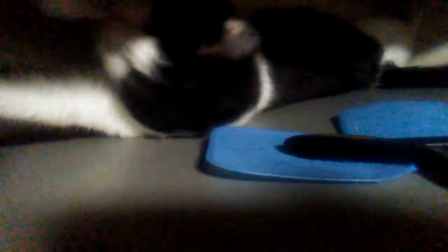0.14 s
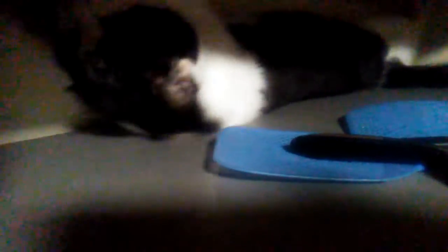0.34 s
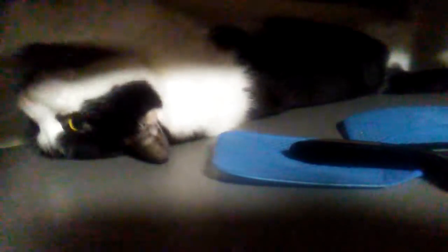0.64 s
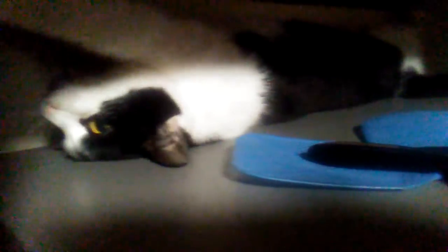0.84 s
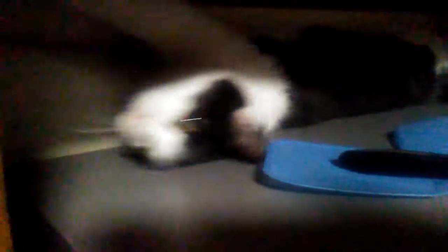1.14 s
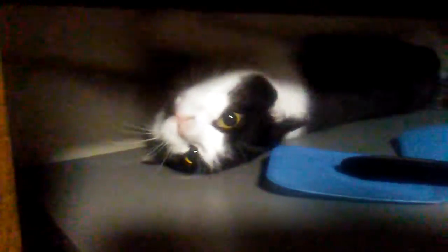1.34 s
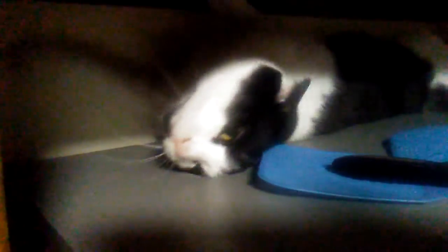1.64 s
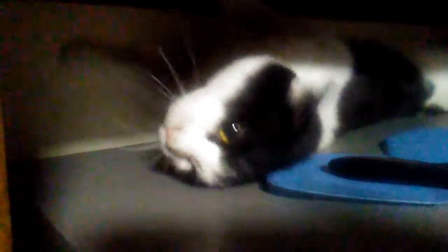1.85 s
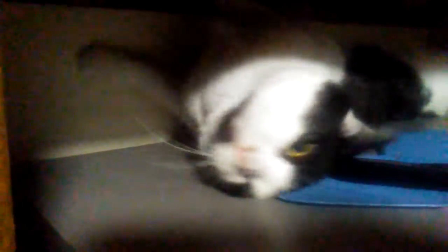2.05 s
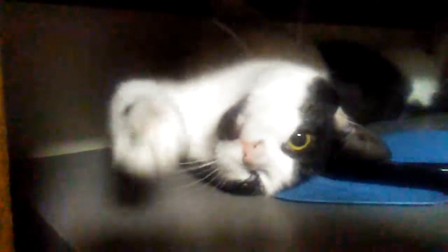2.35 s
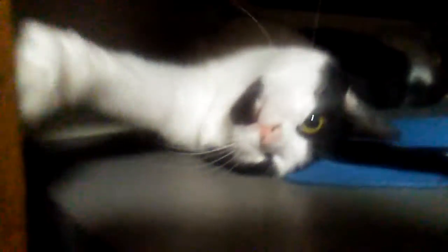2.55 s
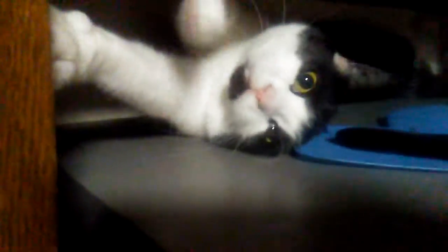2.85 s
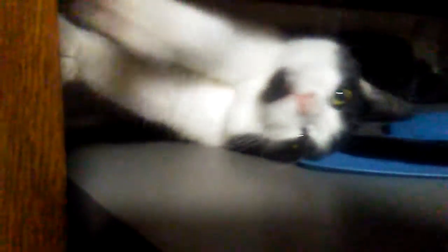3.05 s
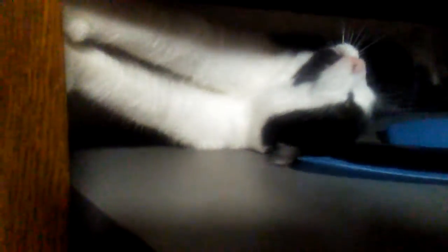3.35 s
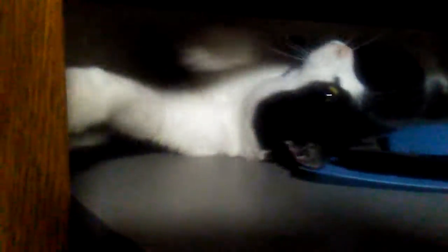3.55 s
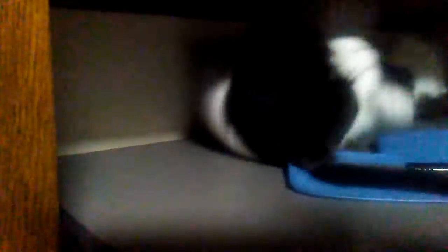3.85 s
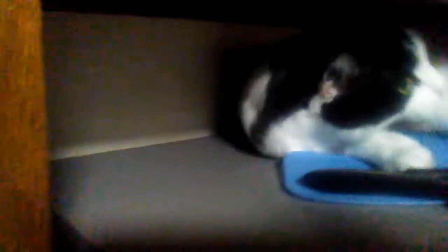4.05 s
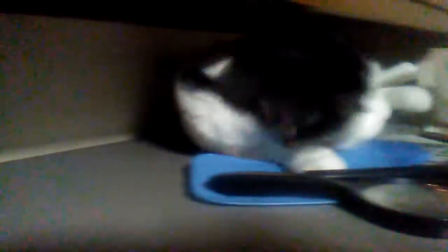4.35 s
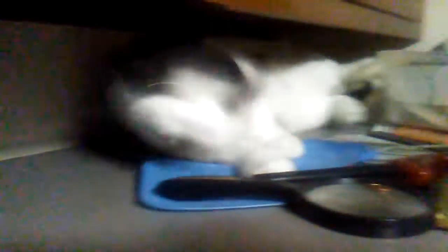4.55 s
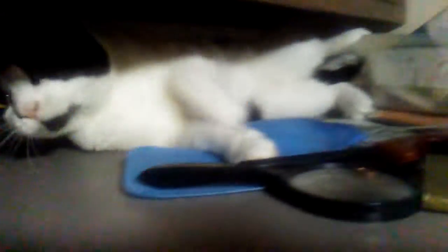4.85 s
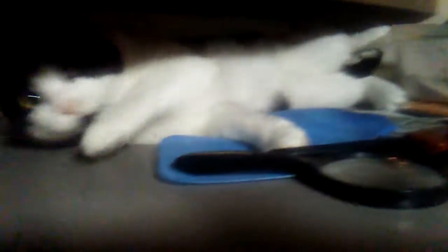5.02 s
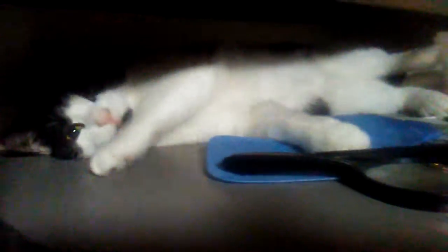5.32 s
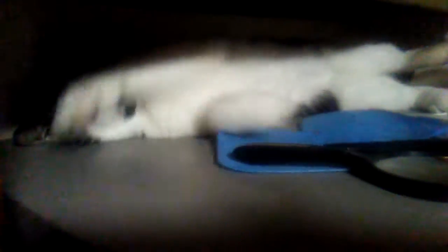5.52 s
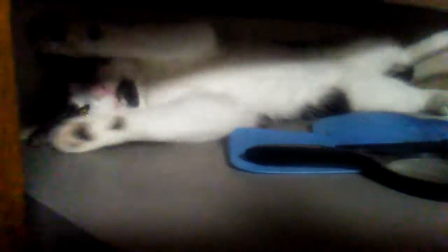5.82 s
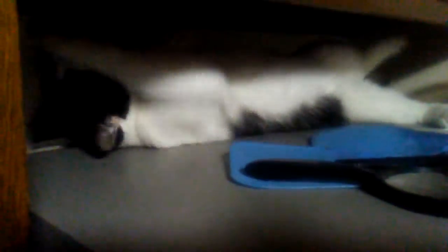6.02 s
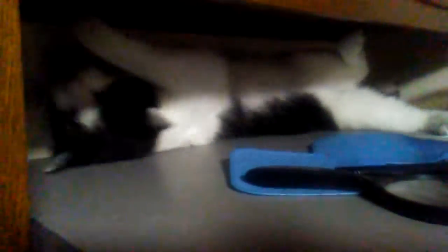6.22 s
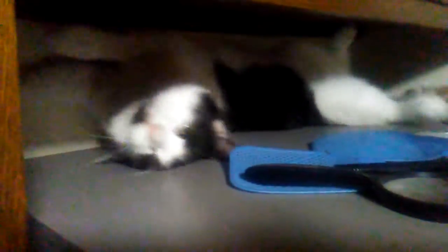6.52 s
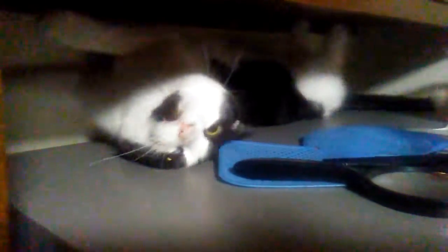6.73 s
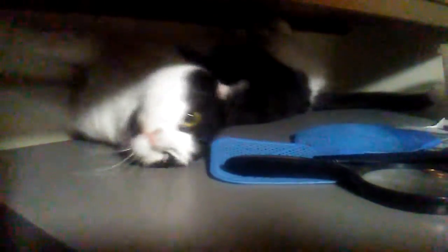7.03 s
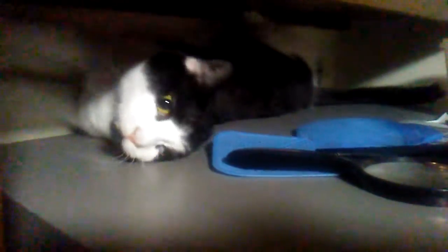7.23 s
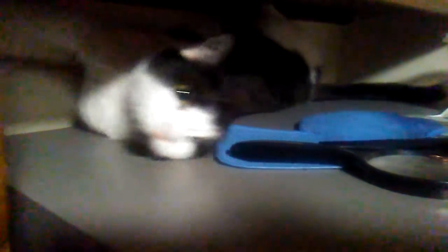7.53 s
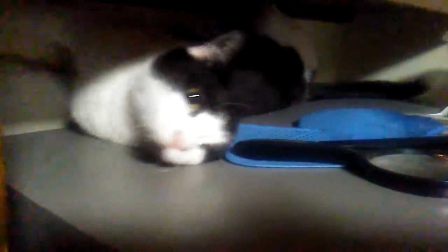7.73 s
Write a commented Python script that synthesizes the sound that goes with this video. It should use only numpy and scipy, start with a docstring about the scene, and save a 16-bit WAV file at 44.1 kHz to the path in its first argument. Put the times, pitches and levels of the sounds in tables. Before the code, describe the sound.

Close, dry indoor sound of a cat squirming on a hard surface under furniture. Fur brushes in short swells, paws slide with bright hisses, claws rasp briefly on a hard edge, and soft paws bump wood. The busiest part is the middle, from about four to six and a half seconds; afterwards only light rustling remains. Behind it all, a refrigerator hums steadily on one note with a muffled airflow.

```python
"""Refrigerator hum and a rolling cat

A refrigerator fan hums as a nearly pure sine, with a soft rush of air as noise shaped by resonances.
Close to the microphone a cat rolls about in a low furniture nook: fur and paws rub as shaped friction
noise, claws ring a hard edge by stick-slip, and paws knock lightly on wood as decaying modes."""
import sys
import numpy as np
from scipy import signal
from scipy.fft import rfft, irfft, next_fast_len
from scipy.io import wavfile
from scipy.ndimage import uniform_filter1d, map_coordinates

SR = 44100
rng = np.random.default_rng(int(sys.argv[2]) if len(sys.argv) > 2 else 0)


def generate_wav(signal):
    """Clip the signal to [-1, 1] and save it as 16-bit WAV at the path in sys.argv[1]."""
    frames = np.transpose(np.atleast_2d(signal))
    scaled = np.clip(frames, -1, 1) * 32767
    pcm = np.round(scaled).astype(np.int16)
    wavfile.write(sys.argv[1], SR, pcm)


N = 347508


def amp(db):
    """Logarithmic level: decibels to amplitude gain."""
    return 10 ** (np.asarray(db) / 20)


def unit(x):
    """Power normalisation: scale a signal to rms 1."""
    return x / np.sqrt(np.mean(x ** 2) + 1e-20)


def colour(points, hz):
    """Spectral envelope: gain through points of frequency_hz, gain_db, joined on a log frequency axis."""
    point_hz, gain_db = np.transpose(points)
    return amp(np.interp(np.log(hz + 1), np.log(point_hz), gain_db))


def resonances(modes, hz):
    """Modal response: gain of centre_hz, width_hz, gain_db modes with steep skirts, added in power."""
    power = 0
    for centre, width, gain_db in modes:
        gain = amp(gain_db) / (1 + ((hz - centre) / width) ** 2)
        power = power + gain ** 2
    return np.sqrt(power)


def brighter(hz, tilt, above_hz=5000):
    """Spectral tilt: treble gain that changes by tilt dB per octave."""
    octaves = np.log2(np.maximum(hz / above_hz, 1))
    return amp(tilt * octaves)


def filtered(x, response):
    """Linear filtering: multiply the spectrum of x by a response of frequency."""
    size = next_fast_len(len(x) + SR // 4)
    spectrum = rfft(x, size) * response(np.fft.rfftfreq(size, 1 / SR))
    return irfft(spectrum, size)[:len(x)]


def wobble(rate):
    """Slow random modulation: a smooth curve through rate random knots a second."""
    knots = rng.standard_normal(int(N * rate / SR) + 4)
    return map_coordinates(knots, [np.arange(N) * rate / SR])


def friction(count, slips_per_s, grain):
    """Stick-slip friction: smooth hiss mixed with tiny separate slips."""
    hiss, sizes = rng.standard_normal((2, count))
    slips = sizes * (rng.random(count) < slips_per_s / SR)
    return unit(hiss + grain * unit(slips))


def patchy(x, depth_db):
    """Varying contact: the colour of a rubbing sound shifts from moment to moment as the contact moves."""
    z = signal.stft(x, nperseg=512)[2]
    field = rng.standard_normal(z.shape)
    field = uniform_filter1d(field, size=3, axis=0)  # across frequency
    field = uniform_filter1d(field, size=10, axis=1)  # across time
    return signal.istft(z * amp(depth_db * unit(field)), nperseg=512)[1][:len(x)]


def from_peak(t, length, rise_share):
    """Stroke envelope shape: distance from the peak, 0 at t = 0 and 1 at the start and end."""
    return np.maximum(-t / rise_share, t / (1 - rise_share)) / length


def add(track, s, sound):
    """Superposition: mix a sound into the track at time s."""
    start = round(s * SR)
    sound = sound[max(-start, 0):]
    part = track[max(start, 0):][:len(sound)]
    part += sound[:len(part)]


def hum(flutter_db=0.23, drift_hz=0.13, octave_db=-35):
    """Periodic fan tone: a sine with a faint octave creeps up in pitch as the fan reaches full speed."""
    start_hz, creep_hz_per_s, full_hz = 348.7, 0.66, 352.0
    full_speed_db, db_per_hz = -24.65, 0.15  # a slower fan is slightly softer
    pitch = np.minimum(start_hz + creep_hz_per_s * np.arange(N) / SR, full_hz)
    phase = 2 * np.pi * np.cumsum(pitch + drift_hz * wobble(8)) / SR
    level_db = full_speed_db + db_per_hz * (pitch - full_hz) + flutter_db * wobble(12)
    tone = np.sin(phase) + amp(octave_db) * np.sin(2 * phase)
    return np.sqrt(2) * amp(level_db) * tone


def air(rush_db=-14, cabinet_db=-14, place_db=-14, sway_db=0.9, move_s=3.82, move_length_s=0.26):
    """Broadband excitation of resonances: fan air fills modes that change as the microphone moves."""
    # spectrum of the open rush: frequency_hz, gain_db
    rush_colour = [(25, -68), (42, -52), (60, -27), (120, -36), (150, -45), (185, -9), (250, -14),
                   (430, -15.5), (1000, -18), (2200, -22), (2800, -25.5), (4050, -28), (4600, -50.5),
                   (16000, -58)]
    # cabinet and kitchen modes that the air excites: centre_hz, width_hz, gain_db
    cabinet_modes = [(138, 3.9, -27), (187.2, 11.3, -4.5), (203.5, 10, -10.5), (224, 4.7, -8.5),
                     (271.8, 5.4, 3), (283.2, 10.2, 3), (301, 8, 1.5), (337.5, 12, 2.5), (362, 20.7, 1.5),
                     (393.8, 7.7, -2), (510, 22.7, -7), (694, 25, -13.5)]
    # modes heard from the first microphone position: centre_hz, width_hz, gain_db
    first_modes = [(708, 12, -13), (1068, 26, -13.5), (1215, 50, -13), (1720, 96, -20), (2253, 110, -18.5),
                   (3130, 76, -21.5), (3560, 290, -23)]
    # modes heard from the second microphone position: centre_hz, width_hz, gain_db
    second_modes = [(632, 29, -15), (681.5, 25, -10), (786, 16, -14.5), (853, 48, -15.5), (999, 30, -9.5),
                    (1061, 35, -12), (1244, 71, -16.5), (1676, 100, -18.5), (1967, 99, -20),
                    (2170, 90, -25.5)]
    broad, boxed, before, after = rng.standard_normal((4, N))
    rush = amp(rush_db + sway_db * wobble(2.4)) * filtered(broad, lambda hz: colour(rush_colour, hz))
    cabinet = amp(cabinet_db) * filtered(boxed, lambda hz: resonances(cabinet_modes, hz))
    # equal-power crossfade between the positions
    moved = (1 + np.tanh((np.arange(N) / SR - move_s) / move_length_s)) / 2
    first = np.sqrt(1 - moved) * filtered(before, lambda hz: resonances(first_modes, hz))
    second = np.sqrt(moved) * filtered(after, lambda hz: resonances(second_modes, hz))
    return rush + cabinet + amp(place_db) * (first + second)


def fur(flicker_db=0.9, patchy_db=1.0, rest_db=-62):
    """Incoherent summation: countless hairs slip over the surface; each turn of the cat is one swell."""
    # turns of the cat: peak_s, level_db, length_s
    turns = [(0.018, -37.5, 0.51), (0.425, -38.5, 0.34), (0.884, -43, 0.91), (1.317, -39, 0.24),
             (1.647, -49, .32), (1.848, -46, .13), (2.066, -47.5, .3), (2.565, -46, .22),
             (2.725, -51.5, 0.071), (2.9, -38, 0.18), (3.286, -51, .33), (3.684, -50.5, 0.29),
             (3.967, -48.5, 0.48), (4.443, -47.5, 1), (5.08, -51, .2), (5.503, -51, 0.32),
             (5.847, -50, .25), (6.26, -48, 0.23), (6.671, -44, 0.18), (7.01, -41, 0.17),
             (7.178, -51, 0.27), (7.4, -50.5, .3), (7.694, -50, 0.76)]
    # spectrum of fur on the surface: frequency_hz, gain_db
    hair_colour = [(400, -22), (1200, -8), (2300, 6.5), (2900, 1), (3950, 4.5), (4600, -18.5),
                   (5500, -17.5), (7000, -2.5), (8400, 0.5), (10000, -6.5), (13000, -11), (16000, -14)]
    rise_share, edge_drop_db, roundness = 0.44, 11, 1.22  # every turn swells and fades alike
    t = np.arange(N) / SR
    power = amp(rest_db) ** 2  # faint brushing between turns
    for s, level_db, length in turns:
        drop_db = edge_drop_db * from_peak(t - s, length, rise_share) ** roundness
        power = power + amp(level_db - drop_db) ** 2
    hairs = patchy(friction(N, slips_per_s=810, grain=0.45), patchy_db)
    brushing = unit(filtered(hairs, lambda hz: colour(hair_colour, hz)))
    return np.sqrt(power) * amp(flicker_db * wobble(35)) * brushing


def swipes(patchy_db=3.5, grain=0.44, judder_db=1.3, rise_share=0.47):
    """Sliding friction: a paw's slips hiss and excite the surface while the stroke swells and fades."""
    # broad strokes of a paw: peak_s, length_s, hiss_db, body_db, pitch_factor
    strokes = [(0.055, 0.12, -40.5, -33, 1.04), (0.333, 0.49, -41.5, -42, 1.1), (0.95, .42, -52, -41, 1.03),
               (1.282, 0.24, -55.5, -36, 1), (4.711, 1, -46.5, -39, 0.984), (4.804, .7, -38, -35, 0.94),
               (4.912, .28, -37.5, -29, .99), (4.968, 0.58, -28.5, -29.5, .96),
               (5.012, 0.41, -33, -26, 1.033), (5.447, .31, -24.5, -31.5, 1.4),
               (5.866, 0.32, -39, -36.5, 1), (6.205, .36, -43.5, -47, 0.87), (6.62, .4, -58, -47, 1.1),
               (6.963, .5, -53.5, -42, 1.03), (7.575, .16, -54, -45, 1.15)]
    # modes of the surface under the paw: centre_hz, width_hz, gain_db
    surface_modes = [(1350, 130, -5.5), (1995, 94, 0.5), (2280, 130, -1.5), (2880, 270, -9),
                     (3460, 140, -8), (3926, 87, -3.5)]
    # spectrum of the hiss: frequency_hz, gain_db
    hiss_colour = [(300, -68), (2000, -29.5), (3000, -17.5), (4200, -9.5), (6000, -7.5), (7200, 0),
                   (9200, -3), (10500, -9.5), (13000, -13), (16000, -19)]
    base_tilt_db, quick_tilt_db = 1.5, 6  # per octave; a quicker, higher swipe is brighter
    track, t = np.zeros(N), np.arange(SR // 2) / SR
    t -= t.mean()  # the peak lies mid-window
    for s, length, hiss_db, body_db, pitch in strokes:
        fall_db = -60 * from_peak(t, length, rise_share)
        stroke = amp(fall_db + judder_db * wobble(70)[:len(t)])
        tilt = base_tilt_db + quick_tilt_db * (pitch - 1)
        slips = patchy(friction(len(t), slips_per_s=730, grain=grain), patchy_db)
        hiss = filtered(slips, lambda hz: colour(hiss_colour, hz) * brighter(hz, tilt))
        body = filtered(slips, lambda hz: resonances(surface_modes, hz / pitch))
        add(track, s + t[0], stroke * (amp(hiss_db) * unit(hiss) + amp(body_db) * unit(body)))
    return track


def knocks(ring_db=-13, crack_db=-7.0, crack_t60=0.073, thud_below_hz=950):
    """Impact excitation of modes: soft paws strike the wood with a dull crack and a short ring."""
    # light knocks: start_s, level_db, thud_db, tilt_db (treble gain at 3 kHz and above)
    blows = [(1.165, -32.5, -3, -12), (1.853, -31, 1, -12), (2.155, -32, -3, -8), (2.665, -32, -3, -6),
             (3.947, -24, 0, -5), (3.974, -28, -11, -5), (4.070, -18.5, -16, -7), (4.146, -17.5, -14, -8),
             (4.782, -31, 7, -11), (4.819, -25, -7, -1), (4.826, -22, 3, -1), (4.831, -22, 3.5, 0),
             (6.059, -32, -4, 9.5), (6.350, -26, 0, -23), (6.354, -21, -5, -5), (6.375, -29.5, -12, -6)]
    # modes of the wood: frequency_hz, level_db, t60_s
    wood_modes = [(517, -3, 0.04), (635, 1, .05), (846, -4, 0.028), (1220, 1, 0.084), (1400, -5, 0.082),
                  (1657, -1.5, 0.06), (1774, 2.5, 0.052), (2160, 5, 0.047), (2410, 2, 0.056),
                  (3110, -1, 0.027), (3450, -12, 0.034)]
    crack_colour = [(200, -9.5), (500, -1.5), (2600, -8.5), (4000, -6.5), (6000, -42)]
    # a soft pad gives little treble and a small panel little bass
    pad_and_panel = [(100, -30.5), (400, 6), (3900, 1.5), (4800, -24.5), (8000, -56)]
    track, t = np.zeros(N), np.arange(SR // 4) / SR
    for s, level_db, thud_db, tilt in blows:
        ring = np.zeros(len(t))
        for mode_hz, mode_db, t60 in wood_modes:
            decay = amp(mode_db + rng.normal(0, 2.9) - 60 * t / t60)  # each blow excites modes unevenly
            ring += decay * np.sin(2 * np.pi * (mode_hz * t + rng.random()))
        puff = filtered(rng.standard_normal(len(t)), lambda hz: colour(crack_colour, hz))
        crack = amp(crack_db - 60 * t / crack_t60) * unit(puff)
        blow = (1 - np.exp(-t / 0.00051)) * (amp(ring_db) * ring + crack)
        # a heavier paw gives more thud
        weight = [(thud_below_hz / 2, thud_db), (thud_below_hz, thud_db / 2), (1500, 0), (3000, tilt)]
        add(track, s, amp(level_db) * filtered(blow, lambda hz: colour(weight, hz)))
    return filtered(track + tick(), lambda hz: colour(pad_and_panel, hz))


def scratches(attack_s=0.0012, rasp_t60=0.25, judder_db=1.5):
    """Stick-slip excitation: a claw catches at once and skids out, ringing the edge under a short rasp."""
    # claws on a hard edge: start_s, level_db, body_db, pitch_factor, tilt_db_per_octave, t60_s
    catches = [(1.185, -47.5, -61, 1.1, 3.5, 0.065), (1.992, -52.5, -52, .92, 4.5, .2),
               (2.565, -53, -58, .82, 0.5, .2), (3.136, -52.5, -65, 1.1, 6, .2),
               (3.857, -41.5, -50, .79, 7.5, .22), (3.907, -38, -52, .8, 14.5, 0.22),
               (3.945, -33, -54, 1.24, -5, 0.042), (4.146, -42.5, -56, .97, 4.5, .053),
               (4.545, -40.5, -49, .9, 6, .11), (4.604, -47, -38, .97, 1.5, 0.42),
               (4.633, -35, -32.5, 0.997, 2, .42), (4.674, -38.5, -34.5, .97, 0, .26),
               (5.393, -40.5, -42, 0.87, -3.5, .1), (5.731, -35, -35.5, 1.0, 1, .19),
               (5.792, -40, -43, .98, -0.5, 0.15), (6.118, -32.5, -30.5, 1.025, -2, .22)]
    # lower modes of the edge: centre_hz, width_hz, gain_db
    body_modes = [(1847, 73, 0), (2120, 45, -6), (2210, 45, -1), (2640, 90, -2.5), (3630, 260, -14.5)]
    # upper modes of the edge: centre_hz, width_hz, gain_db
    top_modes = [(6080, 110, -17), (7080, 240, -3), (8860, 160, -7.5), (9300, 250, -18), (11440, 290, -14),
                 (13700, 230, -20), (14700, 330, -20.5)]
    rasp_colour = [(4500, -29), (5400, -4), (6500, -5), (8000, -6), (16000, -12.5)]
    rasp_db, rasp_per_tilt = -2.5, 0.8  # rasp over the ring; a sharper, brighter catch rasps more
    track, t = np.zeros(N), np.arange(SR // 3) / SR
    for s, level_db, body_db, pitch, tilt, t60 in catches:
        skid = amp(-60 * t / t60 + judder_db * wobble(110)[:len(t)])
        stroke = (1 - np.exp(-t / attack_s)) * skid
        slips = friction(len(t), slips_per_s=1200, grain=0.62)
        top = filtered(slips, lambda hz: resonances(top_modes, hz / pitch) * brighter(hz, tilt))
        body = filtered(slips, lambda hz: resonances(body_modes, hz / pitch))
        noise = rng.standard_normal(len(t))
        rasp = filtered(noise, lambda hz: colour(rasp_colour, hz) * brighter(hz, tilt))
        # the rasp's own decay adds to that of the stroke
        rasp_level = amp(rasp_db + rasp_per_tilt * tilt - 60 * t / rasp_t60)
        bright = unit(top) + rasp_level * unit(rasp)
        add(track, s, stroke * (amp(level_db) * bright + amp(body_db) * unit(body)))
    return track


def tick(s=6.3518, level_db=-19, start_hz=4200, end_hz=1000, glide_s=0.00194, length_s=0.0048):
    """Dispersion: a sharp knock has a falling snap, as high bending waves in a panel arrive first."""
    track, t = np.zeros(N), np.arange(SR // 50) / SR
    hz = end_hz + (start_hz - end_hz) * np.exp(-t / glide_s)
    swell = np.sqrt(np.abs(np.sin(np.pi * np.minimum(t / length_s, 1))))
    add(track, s, amp(level_db) * swell * np.sin(2 * np.pi * np.cumsum(hz) / SR))
    return track


def scene():
    """Superposition of sources: the refrigerator behind, the cat in front."""
    refrigerator = hum() + air()
    cat = fur() + swipes() + knocks() + scratches()
    return (refrigerator + cat)[None]


def record(dry):
    """Transducer response: the microphone's colour and the recorder's band limit."""
    # the microphone is dull in a narrow band: frequency_hz, gain_db
    microphone = [(4050, -1), (4400, -14.5), (4900, -14.5), (5300, -6.5), (5700, 1.5)]
    top_hz = 15800
    return filtered(dry[0], lambda hz: colour(microphone, hz) * (hz < top_hz))[None]


dry = scene()
out = record(dry)
generate_wav(out)
```